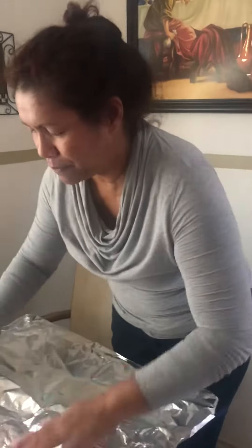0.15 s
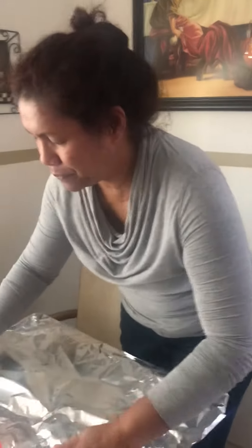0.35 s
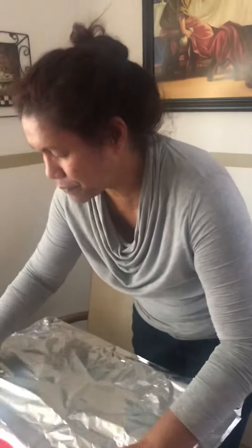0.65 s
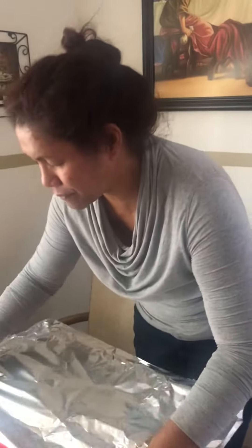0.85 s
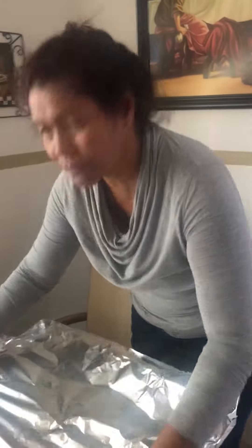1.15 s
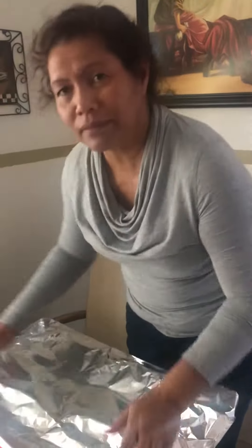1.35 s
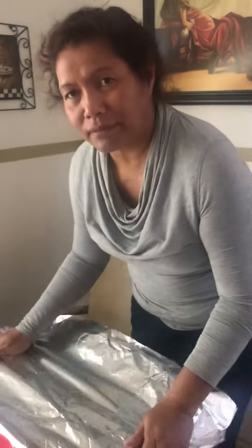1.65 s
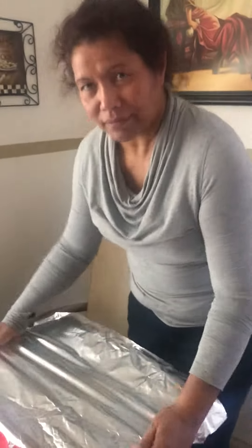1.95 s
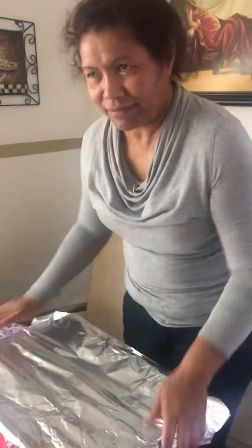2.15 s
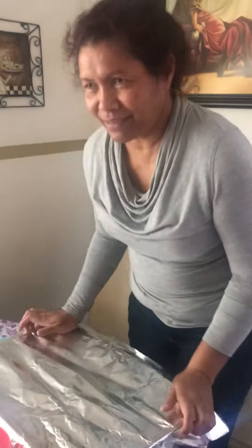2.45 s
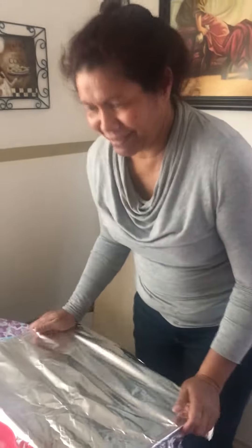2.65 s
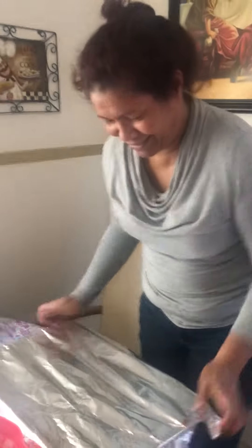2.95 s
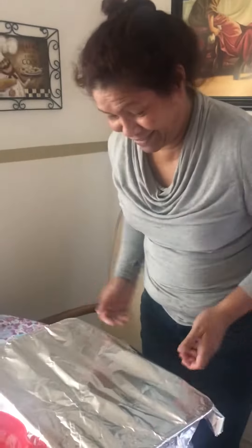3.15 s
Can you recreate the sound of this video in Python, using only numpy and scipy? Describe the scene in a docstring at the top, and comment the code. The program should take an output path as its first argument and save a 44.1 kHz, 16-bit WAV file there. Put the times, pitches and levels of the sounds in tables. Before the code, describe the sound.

Aluminium foil is crimped over a baking pan. After near quiet, dense bright crackling runs from 0.25 to 1.1 seconds, with a brief hollow flex near 0.8, then a short rustle at 1.2. Stronger crinkling fills 1.5 to 2.2, with a dull bouncing pan knock at 1.9. A sharp burst at 2.3 leads to lighter rustles, fading after 3.05 with a faint late tick. Hard kitchen echo, low rumble and hum.

```python
"""Aluminium foil is pressed and crimped over a baking pan in a kitchen, in several handfuls. Its creases are
thousands of random clicks a second, filtered into bands; folds buckle in dying runs of snaps and the sheet
flexes with a hollow rustle. A knock with two quick further contacts rings the pan's damped modes. Noise echoes
give the hard room; air noise, a low rumble and a faint hum lie underneath. One microphone."""
import sys
import numpy as np
from scipy import signal
from scipy.fft import rfft, irfft, next_fast_len
from scipy.io import wavfile

SR = 44100
rng = np.random.default_rng(int(sys.argv[2]) if len(sys.argv) > 2 else 0)


def digitize_waveform(pressure):
    """Quantize a signal to 16-bit integers and store it at the path in sys.argv[1].

    Rows of a 2-D input are taken as channels; values are limited to [-1, 1].
    """
    field = np.atleast_2d(pressure).T
    bounded = np.clip(field, -1, 1)
    quanta = np.round(bounded * 32767).astype(np.int16)
    wavfile.write(sys.argv[1], SR, quanta)


N = 145530
T = np.arange(N) / SR  # time [s]

# Presses of the hands, levels before the register trims:
# (time [s], treble level [dB], upper middle level [dB], lower middle level [dB])
SETTLE = [(0.0, -44.5, -45.5, -47.5), (0.07, -74, -56.5, -68), (0.235, -57, -60, -53)]
FIRST_PRESS = [(0.254, -30, -37, -45.5), (0.286, -25, -31.5, -39.5), (0.331, -28.5, -33.5, -40.5),
               (0.364, -35.5, -42.5, -44), (0.47, -33, -36.5, -42), (0.499, -26.5, -34.5, -38.5),
               (0.549, -28.5, -34.5, -39.5), (0.6, -32.5, -38.5, -45)]
LONG_CRIMP = [(0.649, -28.0, -34, -37), (0.81, -26.5, -33, -37.5), (0.85, -34, -37.0, -42.5),
              (0.885, -26.5, -34.5, -35), (0.955, -26, -30.5, -38.5), (0.996, -36.5, -41, -42.5),
              (1.045, -31.5, -32, -38.5), (1.09, -45.5, -49, -57)]
LET_GO = [(1.151, -37, -40, -41.5), (1.215, -25.5, -33.0, -41.5), (1.26, -30.5, -36.5, -53),
          (1.3, -44, -48, -53), (1.401, -61, -51, -73), (1.496, -54.5, -58, -59)]
STRETCH = [(1.515, -31.5, -33, -40), (1.569, -22.5, -30, -36), (1.64, -25.5, -29, -37.5),
           (1.7, -30.5, -33.5, -41), (1.745, -26.0, -30.5, -35), (1.789, -37.5, -41, -47.0),
           (1.809, -22.5, -28.5, -39.0), (1.9, -31, -33.5, -35.5), (1.96, -30, -32.5, -45),
           (1.99, -42, -38, -56)]
TUCK = [(2.021, -26.0, -28.5, -41.5), (2.09, -31.5, -37, -45.5), (2.12, -47.0, -49, -62),
        (2.19, -42, -44.5, -50), (2.235, -60.0, -57, -62), (2.306, -54, -47, -59.0)]
NEW_GRIP = [(2.312, -35, -37, -44), (2.327, -21, -27.5, -33), (2.353, -30, -34.5, -42),
            (2.385, -33.5, -37.5, -46.5), (2.455, -32, -37.5, -41.5), (2.5, -30, -32, -42.0),
            (2.57, -30.5, -34.5, -43.0), (2.595, -27.5, -28, -37.5), (2.68, -25.5, -32.0, -42)]
SMOOTH_RIM = [(2.71, -34, -37, -41), (2.79, -32, -31, -47), (2.855, -38, -38, -45.5),
              (2.931, -29, -32, -47.5), (2.974, -43.5, -47, -53), (3.009, -29.5, -32.5, -46.5),
              (3.061, -46.5, -46, -58), (3.14, -60.5, -62, -58), (3.258, -62, -65, -56),
              (3.27, -39, -42, -59), (3.3, -48, -43, -53)]
# Registers, low to high, and how far the whole foil sound exceeds each: (centre [Hz], trim [dB])
REGISTERS = [(1200, 12.5), (3900, 7), (7500, 4)]
# Relative spectrum of the foil: (frequency [Hz], density [dB per Hz])
FOIL_SPECTRUM = [(290, -14), (500, -16), (561, -8.5), (759, -10), (877, -7), (915, -14.5), (998, -5),
                 (2020, -4), (4460, 0), (5000, -3), (6670, -1), (7710, -5.5), (9560, -3), (10400, -6.5),
                 (12400, -1), (15600, -3)]
FOIL_LOW_HZ = 386
SNAPS_PER_S, USUAL_DB = 11000, -27  # the snap rate when the treble column is at its usual level
RATE_FOLLOWS = .45  # share of the treble's swing in dB that the snap rate takes
SNAP_SPREAD_DB = 2
CLUMP_DB, CLUMP_RATE_HZ = 1, 57
# Single folds that buckle, before the foil spectrum: (time [s], level [dB])
BUCKLES = [(0.481, -20.5), (0.806, -22), (.877, -20.5), (1.017, -23.5), (1.207, -24.5), (1.25, -26),
           (1.346, -32), (1.421, -41.5), (1.498, -34), (1.578, -22), (1.802, -24), (1.969, -23),
           (2.005, -21.5), (2.142, -28), (2.278, -36), (3.266, -36)]
BUCKLE_DECAY_S, BUCKLE_SNAPS_PER_S = 0.0092, 9000
# Flexing of the whole sheet: (middle [s], half length [s], level [dB])
FLEXES = [(.668, 0.027, -42.5), (.785, .022, -35.5), (0.904, 0.017, -44), (1.046, 0.016, -48),
          (2.62, 0.008, -43)]
FLEX_BAND_HZ, FLEX_SNAPS_PER_S = (597, 980), 900
# Knock on the pan, a first strike and two quick further contacts, as strike strength: (time [s], level [dB])
KNOCKS = [(1.9074, -13.5), (1.9109, -25), (1.9163, -27)]
# Modes of the pan: (frequency [Hz], gain [dB], 60 dB decay time [s])
PAN_MODES = [(566, -14, 0.041), (740, -17, 0.11), (1150, -6, 0.01), (1340, -11.5, 0.018),
             (1740, -4.5, 0.011), (1900, -10, 0.019)]
PAN_BAND_HZ = (444, 2270)
# Reverberation time of the kitchen: (frequency [Hz], 60 dB decay time [s])
ROOM_T60 = [(500, 0.38), (4000, 0.41), (9000, 0.31), (15000, 0.14)]
# Tail and early reflections, relative to the direct sound
FOIL_TAIL_DB, FOIL_EARLY_DB = -2.5, -1
PAN_TAIL_DB, PAN_EARLY_DB = -7, -4
EARLY_DECAY_S, TAIL_RISE_S, HOP_S = 0.0051, .006, .003
# Relative spectrum of the room tone: (frequency [Hz], density [dB per Hz])
AIR_SPECTRUM = [(50, -19), (90, -6.5), (140, -4), (280, -2.5), (400, -10.5), (500, -11.5), (900, -13),
                (1300, -21.5), (4000, -28), (8000, -28), (15000, -36)]
AIR_DB = -49.5
RUMBLE_HZ, RUMBLE_WIDTH_HZ, RUMBLE_DB = 42.8, 8.4, -48.5
# Partials of the hum: (frequency [Hz], rms level [dB])
HUM = [(74, -62), (119, -71), (139.5, -57.5), (184.5, -67), (385, -61)]
HUM_WAVER_RAD = 1.1
CUTOFF_HZ = 15720


def from_db(db):
    """Level law: twenty decibels are a factor of ten in amplitude."""
    return 10 ** (np.asarray(db) / 20)


def rms_one(x):
    """Normalisation: scale to unit root-mean-square."""
    return x / np.sqrt(np.mean(x ** 2) + 1e-20)


def at_hz(points, hz):
    """Interpolation on a logarithmic frequency axis."""
    f, v = np.transpose(points)
    return np.interp(np.log(np.maximum(hz, 1)), np.log(f), v)


def butter(x, hz, kind, order=2):
    """Linear filtering with a Butterworth response."""
    edges = np.clip(hz, 10, SR / 2 - 100)
    sos = signal.butter(order, edges, kind, fs=SR, output="sos")
    return signal.sosfilt(sos, x + 1e-18)


def colour(x, spectrum):
    """Spectral shaping: multiply the Fourier transform by a smooth gain curve."""
    size = next_fast_len(N + N // 10)
    gain = from_db(at_hz(spectrum, np.fft.rfftfreq(size, 1 / SR)))
    return irfft(rfft(x, size) * gain, size)[:N]


def drift(rate_hz):
    """Random modulation: low-passed noise of unit rms, taken after the filter has settled."""
    return rms_one(butter(rng.standard_normal(N + SR), rate_hz, "low")[SR:])


def bands(count=14):
    """Band analysis: edges of the geometric bands shared by foil and room."""
    edges = np.geomspace(250, 17500, count + 1)
    return list(zip(edges, edges[1:]))


def snaps(per_s):
    """Random impulse process: many small clicks, a few large; mean power 1 whatever the rate."""
    chance = np.clip(per_s / SR, 1e-5, 1)
    sizes = rms_one(from_db(SNAP_SPREAD_DB * np.minimum(rng.exponential(1, N), 4.5)))
    return sizes * (rng.random(N) < chance) / np.sqrt(chance)


def foil_ring(clicks, level_at):
    """Impulse excitation: each snap has its own random strength in every band of the foil."""
    out = 0
    for low, high in bands():
        struck = butter(clicks * rng.standard_normal(N), [low, high], "band")
        out = out + level_at(np.sqrt(low * high)) * struck
    gains = from_db(at_hz(FOIL_SPECTRUM, np.linspace(0, CUTOFF_HZ)))
    usual_gain = np.sqrt(np.mean(gains ** 2))
    return butter(colour(out, FOIL_SPECTRUM), FOIL_LOW_HZ, "high") / usual_gain


def crinkle():
    """Crackling noise: creases snap in clumps, faster and louder as the hands press harder."""
    presses = np.vstack([SETTLE, FIRST_PRESS, LONG_CRIMP, LET_GO, STRETCH, TUCK, NEW_GRIP, SMOOTH_RIM])
    s, *columns = presses.T
    treble, upper, lower = [np.interp(T, s, column) for column in columns]
    centres, trims = np.transpose(REGISTERS)
    levels = np.array([lower, upper, treble]) + trims[:, None]
    rate = SNAPS_PER_S * from_db(RATE_FOLLOWS * (treble - USUAL_DB))
    clicks = snaps(rate)
    clumps = rms_one(from_db(CLUMP_DB * drift(CLUMP_RATE_HZ)))

    def level_at(hz):
        """Interpolation: blend the levels of the registers next to this frequency."""
        shares = np.array([np.interp(np.log(hz), np.log(centres), row) for row in np.eye(len(centres))])
        return from_db(shares @ levels)
    return foil_ring(clicks * clumps, level_at)


def buckles():
    """Buckling instability: a fold gives way in an exponentially dying run of snaps."""
    force = 0
    for s, db in BUCKLES:
        force = force + from_db(db) * (T >= s) * np.exp(-np.abs(T - s) / BUCKLE_DECAY_S)
    return foil_ring(force * snaps(BUCKLE_SNAPS_PER_S), lambda hz: 1)


def flexes():
    """Snap-through of large facets: band-passed clicks swell and fade as a brief hollow rustle."""
    force = sum(from_db(db) * np.exp(-((T - s) / half_s) ** 2) for s, half_s, db in FLEXES)
    return force * rms_one(butter(snaps(FLEX_SNAPS_PER_S), FLEX_BAND_HZ, "band"))


def pan():
    """Modal synthesis: short knocks excite damped two-pole resonances of the pan."""
    clicks, out = np.zeros(N), 0
    for s, db in KNOCKS:
        clicks[int(s * SR)] = from_db(db)
    for hz, db, t60 in PAN_MODES:
        radius = from_db(-60 / (t60 * SR))  # decay per sample
        angle = 2 * np.pi * hz / SR
        poles = [1, -2 * radius * np.cos(angle), radius * radius]
        out = out + from_db(db) * signal.lfilter([0, np.sin(angle)], poles, clicks + 1e-18)
    return out


def kitchen(x, tail_db, early_db, count=24):
    """Reverberation: sound hops between places, each with early reflections and a tail decaying by band."""
    t = T[:SR // 3]
    white = rng.standard_normal((2, count, len(t)))
    tail = 0
    for k, edges in enumerate(bands()):
        t60 = at_hz(ROOM_T60, np.sqrt(np.prod(edges)))
        # neighbouring bands draw on different noise
        tail = tail + butter(white[k % 2], edges, "band") * from_db(-60 * t / t60)
    tail = tail * np.minimum(t / TAIL_RISE_S, 1)
    early = rng.standard_normal(tail.shape) * np.exp(-t / EARLY_DECAY_S)
    echoes = from_db(tail_db) * rms_one(tail) + from_db(early_db) * rms_one(early)
    echoes = echoes / np.sqrt(len(t))

    hops = np.arange(0, N / SR, HOP_S)
    place = rng.integers(0, count, len(hops))
    wet = 0
    for k, echo in enumerate(echoes):
        share = np.sqrt(np.interp(T, hops, place == k))  # equal-power crossfade
        wet = wet + signal.fftconvolve(x * share, echo)[:N]
    return (x + wet) / np.sqrt(1 + from_db(tail_db) ** 2 + from_db(early_db) ** 2)


def room_tone():
    """Stationary background: dull air noise, narrow-band rumble and phase-modulated hum partials."""
    air = rms_one(butter(colour(rng.standard_normal(N), AIR_SPECTRUM), 47, "high", order=4))
    rumble_band = [RUMBLE_HZ - RUMBLE_WIDTH_HZ / 2, RUMBLE_HZ + RUMBLE_WIDTH_HZ / 2]
    rumble = rms_one(butter(rng.standard_normal(N + SR), rumble_band, "band")[SR:])
    hum = 0
    for hz, db in HUM:
        phase = 2 * np.pi * hz * T + HUM_WAVER_RAD * drift(4)
        hum = hum + from_db(db) * np.sqrt(2) * np.sin(phase)
    return from_db(AIR_DB) * air + from_db(RUMBLE_DB) * rumble + hum


def scene():
    """Superposition: foil and pan in the kitchen over the room tone, the same in both channels."""
    foil = kitchen(crinkle() + buckles() + flexes(), FOIL_TAIL_DB, FOIL_EARLY_DB)
    knock = kitchen(pan(), PAN_TAIL_DB, PAN_EARLY_DB, count=3)
    knock = butter(knock, PAN_BAND_HZ, "band", order=3)
    mono = foil + knock + room_tone()
    return np.array([mono, mono])


def record(dry):
    """Band limitation: a steep elliptic low-pass cuts the top."""
    sos = signal.ellip(12, .1, 80, CUTOFF_HZ, fs=SR, output="sos")
    return signal.sosfilt(sos, dry)


dry = scene()
out = record(dry)
digitize_waveform(out)
```